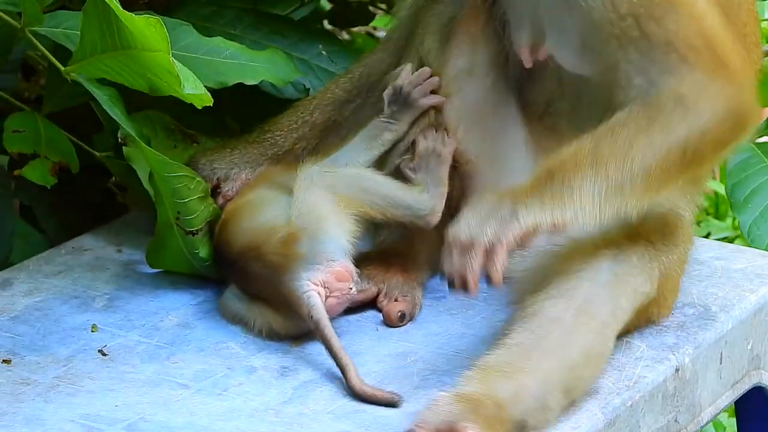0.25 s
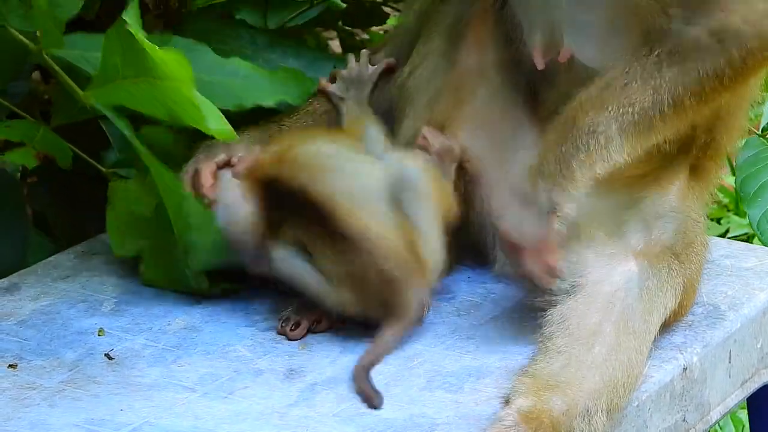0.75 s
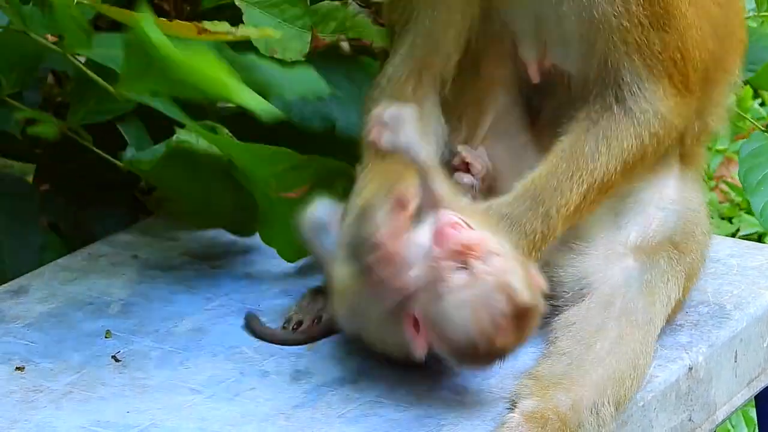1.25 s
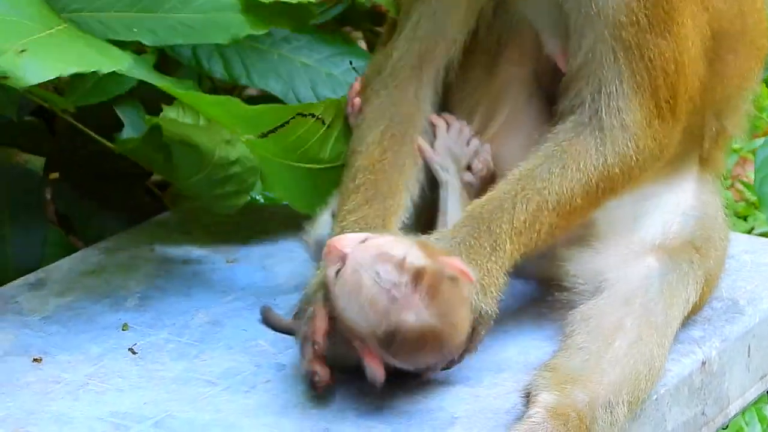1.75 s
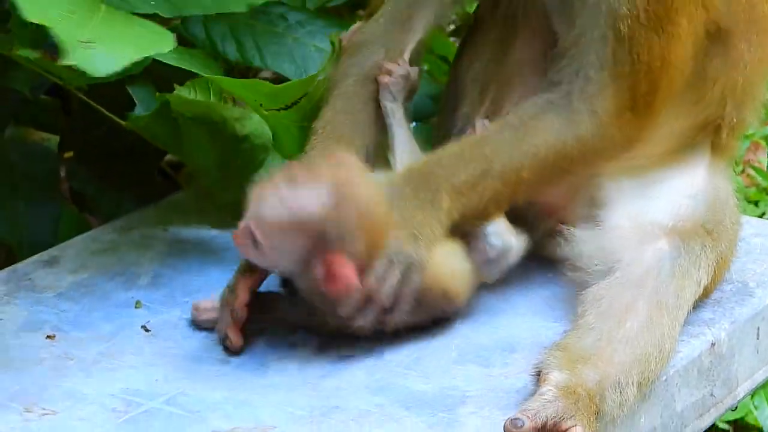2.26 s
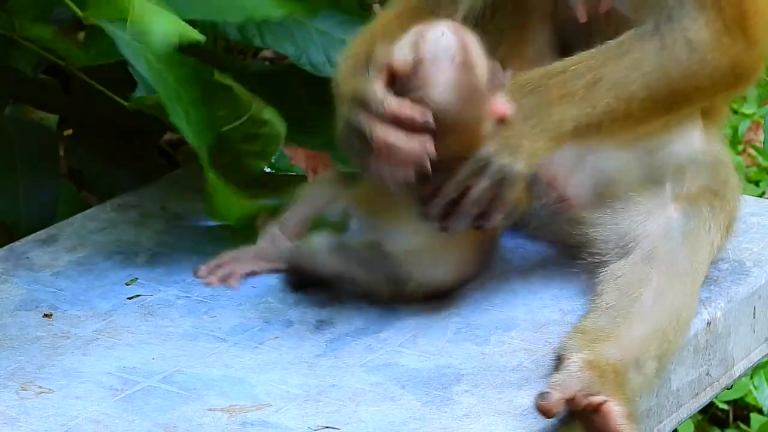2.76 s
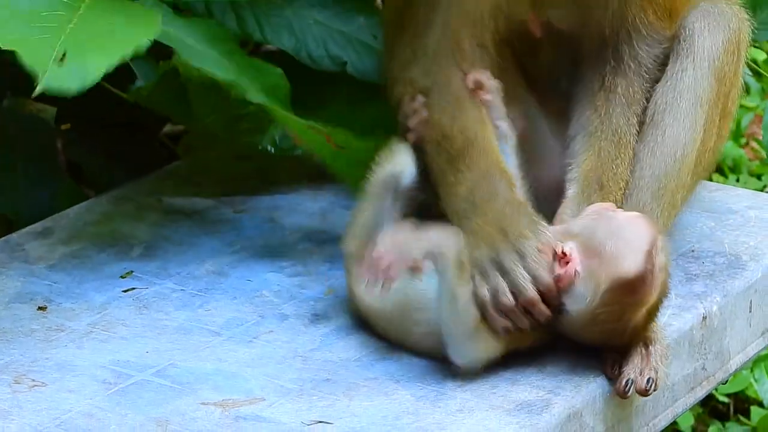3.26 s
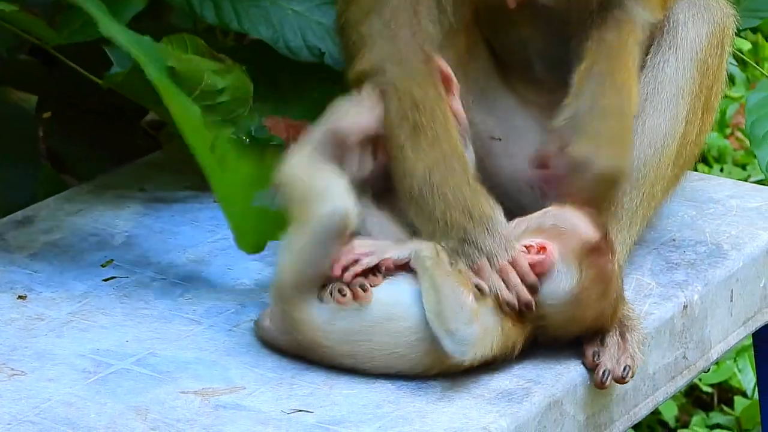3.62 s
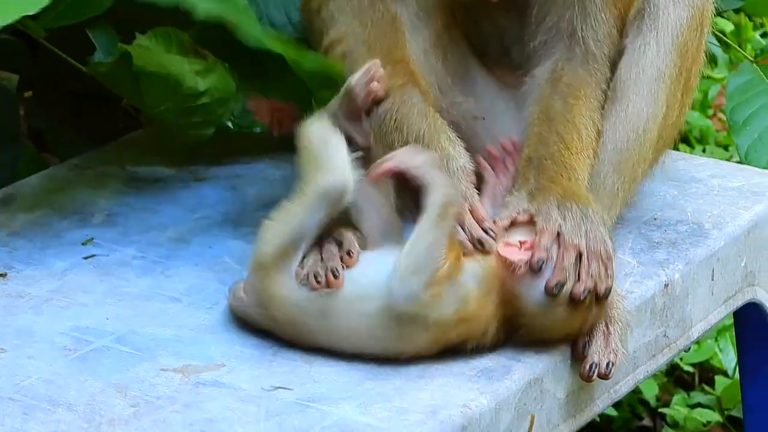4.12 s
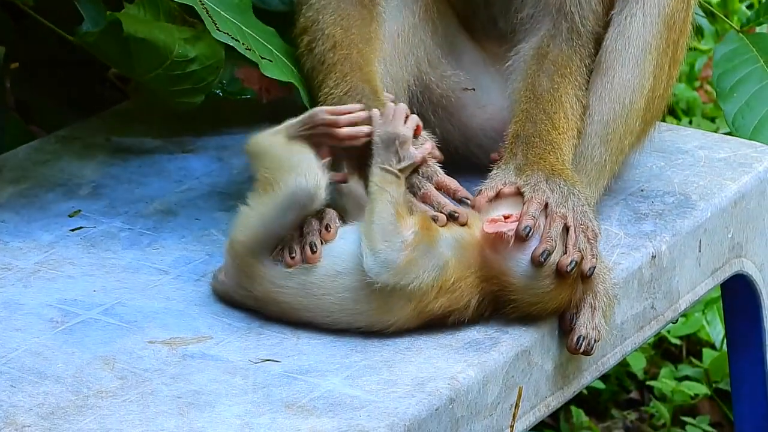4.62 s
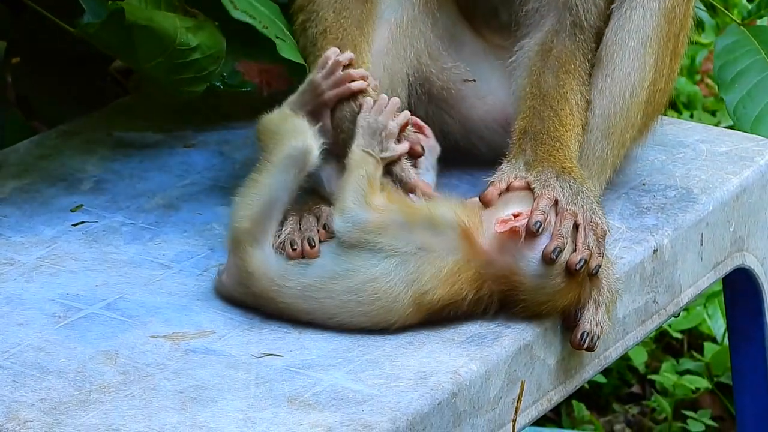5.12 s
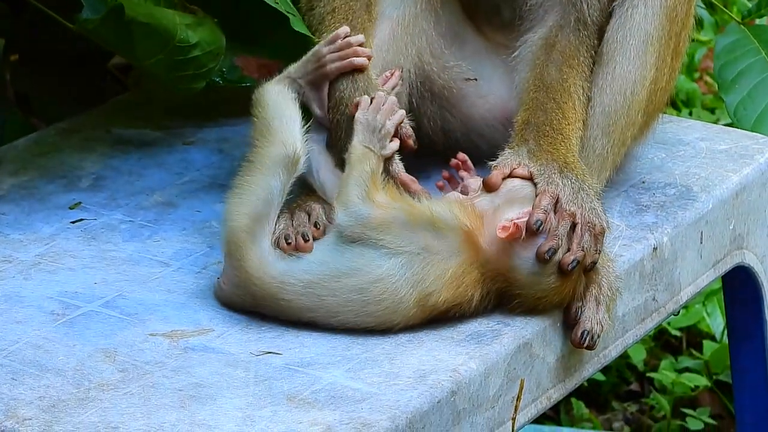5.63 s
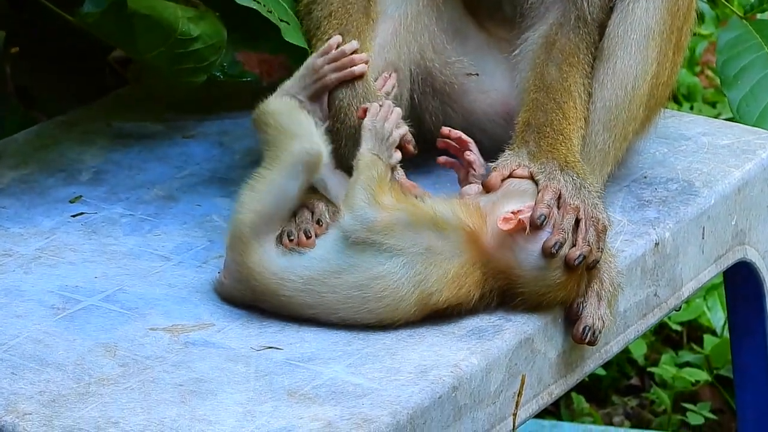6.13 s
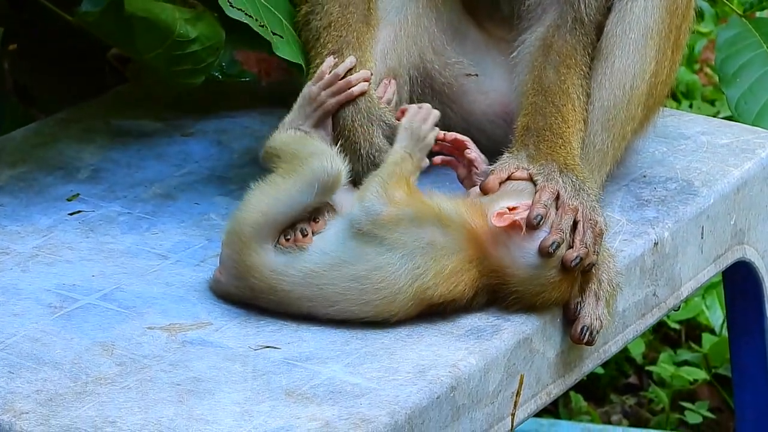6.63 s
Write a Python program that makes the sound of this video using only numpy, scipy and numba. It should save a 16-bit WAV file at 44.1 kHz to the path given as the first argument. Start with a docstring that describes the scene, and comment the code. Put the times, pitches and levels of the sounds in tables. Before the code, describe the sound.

A baby monkey on a plastic table coos, shrieks in piercing ragged bursts between hoarse barks, then quiets to small barks and whimpers outdoors.

```python
"""Baby monkey tantrum

A baby monkey, pinned on a plastic table, coos, screams in bouts amid hoarse barks, and ends in barks and whimpers.
A scream is a whistling membrane tone chopped by the slower, irregular vocal folds; barks are ragged pulses
in the throat; coos and whimpers are harmonic stacks. Limbs knock on the table and brush leaves as filtered
noise; the garden gives a faint echo over a soft outdoor hiss."""
import sys
import numpy as np
from scipy import signal
from scipy.fft import rfft, irfft
from scipy.io import wavfile
from numba import njit

SR = 44100
rng = np.random.default_rng(int(sys.argv[2]) if len(sys.argv) > 2 else 0)


def master_out(mix):
    """Clip the mix to full scale and print it as 16-bit PCM to the path in sys.argv[1]."""
    frames = np.transpose(np.atleast_2d(mix))
    ceiling = np.clip(frames, -1, 1)
    pcm = np.round(ceiling * 32767).astype(np.int16)
    wavfile.write(sys.argv[1], SR, pcm)


N = 303408
T = np.arange(N) / SR


def undb(db):
    """Level in dB to amplitude."""
    return 10 ** (np.asarray(db) / 20)


def unit(x):
    """Scale to an RMS of 1."""
    return x / np.sqrt(np.mean(x ** 2) + 1e-18)


def colour(x, points):
    """Filter by a spectrum of (f/Hz, level/dB) points."""
    hz, db = np.transpose(points)
    f = np.maximum(np.fft.rfftfreq(x.shape[-1], 1 / SR), 1)
    gain = undb(np.interp(np.log(f), np.log(hz), db))
    return irfft(rfft(x) * gain, x.shape[-1])


def wander(n, hz):
    """Smooth random motion of spread 1, mostly slower than hz."""
    lowpass = signal.butter(2, hz, fs=SR, output="sos")
    noise = rng.standard_normal(n + SR // 10)  # the extra tenth of a second lets the filter settle
    return unit(signal.sosfilt(lowpass, noise)[-n:])


@njit
def svf(x, hz, width):
    """State-variable band-pass with a moving centre."""
    y, b, l = np.empty(len(x)), 0., 0.
    for i in range(len(x)):
        g, k = np.tan(np.pi * hz[i] / SR), width / hz[i]
        v = (b + g * (x[i] - l)) / (1 + g * (g + k))
        b, l, y[i] = 2 * v - b, l + 2 * g * v, k * v
    return y


def resonate(x, hz, width):
    """A resonance with steep skirts: two band-passes in a row."""
    centre = np.minimum(hz + np.zeros(len(x)), .45 * SR)
    return svf(svf(x, centre, float(width)), centre, float(width))


def controls(rows):
    """The times that a table spans, and its columns at each of them."""
    s, *columns = np.transpose(rows)
    t = np.arange(max(s[0], 0), s[-1], 1 / SR)
    return t, *(np.interp(t, s, c) for c in columns)


def add(track, start, x):
    """Mix x into the track from start (s), or from the track's beginning if that is negative."""
    i = max(int(start * SR), 0)
    track[i:i + len(x)] += x[:N - i]


def turns(hz):
    """Phase of a gliding pitch (rad)."""
    return 2 * np.pi * np.cumsum(hz) / SR


# outdoor background, before each layer's own trim: [t/s, level/dB]
AIR_LEVEL = [(.8, -47.5), (1.05, -54.5), (2.5, -52.5), (4.0, -60), (4.7, -60.5), (5.5, -54), (6.0, -49),
             (6.85, -48)]
# spectral shape of the low murmur: [f/Hz, relative level/dB per Hz]
MURMUR_SPECTRUM = [(18, -72.5), (30, -64), (91, -9.5), (270, 2), (377, -1.5), (526, -2), (722, 2), (845, 1),
                   (1240, -3.5), (1540, -5), (2000, -9), (2600, -30), (4400, -120)]
# spectral shape of the leafy hiss: [f/Hz, relative level/dB per Hz]
HISS_SPECTRUM = [(880, -13.5), (1500, -3), (1900, -11.5), (2200, -1), (2720, -4), (2920, -2.5), (3120, -1),
                 (6560, -3.5), (11300, -15.5), (13500, -28), (15500, -36)]
DIP_DB, DIP_RECOVERY_S = -7, 0.15  # how far the murmur sinks by a scream's end, and its return time constant


def air(low_db=-2.0, hiss_db=0, low_side=0.32, hiss_side=0.8, right_db=2.5):
    """A low murmur, which sinks during each scream and then returns, and a wide leafy hiss; both flicker."""
    level = np.interp(T, *np.transpose(AIR_LEVEL))
    dips = []
    for rows in SCREAM_CURVES:
        start, end = rows[0][0], rows[-1][0]
        sinking = np.interp(T, (start, end), (0, 1))
        dips.append(sinking * np.exp(-np.maximum(T - end, 0) / DIP_RECOVERY_S))
    dip = np.max(dips, axis=0)
    layers = ((MURMUR_SPECTRUM, level + low_db + DIP_DB * dip, low_side),
              (HISS_SPECTRUM, level + hiss_db, hiss_side))
    out, sides = 0, np.array([[-1], [1]])  # left, right
    for spectrum, level_db, width in layers:
        mid, side = (unit(colour(rng.standard_normal(N), spectrum)) for _ in range(2))
        flicker_db = 1.1 * wander(N, 12)
        out = out + undb(level_db + flicker_db) * (mid + width * sides * side)
    return out * undb(sides * right_db / 2)


# one curve for each clear coo: [t/s, pitch f/Hz, relative level/dB]
COO_CURVES = [
    [(0.0, 910, -27), (0.02, 935, -30), (0.094, 786, -21), (0.116, 831, -32.5), (0.15, 839, -33.5),
     (0.172, 933, -39), (0.25, 960, -62)],
    [(5.64, 632, -34.5), (5.67, 550, -47), (5.688, 750, -34.5), (5.714, 945, -37), (5.748, 773.6, -37.5),
     (5.786, 826, -40.5), (5.89, 779, -51)],
]
# one row a coo, harmonics from the first up, before darkening: [relative level/dB]
COO_STACKS = [
    [0, -5, -5.5, -13, -12.5, -22, -30, -31, -18],
    [-2.6, -2.5, -7, -4.5, -7, -1.5, -6, -7, -12],
]


def coo(rows, harmonics, jitter=0.0125, shimmer_db=2, darken=0.051):
    """Evenly swinging folds give a harmonic stack, duller as the effort fades."""
    t, hz, db = controls(rows)
    n = len(t)
    phase = turns(hz * (1 + jitter * wander(n, 207)))
    effort_db = db - db.max()
    stack = 0
    for k, h in enumerate(harmonics, 1):
        harmonic_db = h + darken * (k - 7.5) * effort_db + shimmer_db * wander(n, 43.0)
        stack = stack + undb(harmonic_db) * np.sin(k * phase)
    return undb(db) * unit(stack)


# limbs knock on the table: [t/s, peak level/dB, centre f/Hz, t60/s]
KNOCK_HITS = [(0.088, -27.5, 885, 0.027), (.451, -34, 1750, 0.04), (.563, -32, 2740, 0.031),
              (0.64, -33, 1780, 0.1), (.651, -24, 1330, 0.075), (.657, -30, 1230, 0.07),
              (.712, -24.5, 2800, 0.032), (1.634, -31, 1490, 0.066), (2.257, -34, 700, 0.042),
              (2.543, -39, 336, 0.19), (4.176, -44, 352, 0.1), (4.58, -39.5, 714, 0.12),
              (5.203, -39, 3400, 0.13), (5.838, -30, 2660, 0.068), (6.433, -32.5, 2400, 0.092),
              (6.457, -22.5, 2200, 0.046), (6.462, -25.5, 1000, 0.074)]
# ringing modes of the table top: [f/Hz, relative level/dB, t60/s]
TABLE_RING = [(338, -3.5, 0.038), (643, -4, 0.033), (810, -10.5, 0.019), (1430, -18.5, 0.067),
              (2400, -9.5, 0.042), (3330, -30, 0.012)]
# leaves and fur brush past: [t of the swell's middle/s, level/dB, length/s, centre f/Hz]
BRUSHES = [(.1, -39, 0.075, 2800), (0.195, -38, 0.021, 3000), (0.24, -39.5, 0.013, 3070),
           (0.285, -43, 0.031, 3760), (0.721, -51, 0.013, 4000), (1.646, -38.5, 0.013, 5650),
           (2.054, -41, 0.03, 2530), (6.07, -41.5, 0.016, 2870)]


def scuffle(ring_db=-7, grain_db=4):
    """Noise knocks ring the table modes through a band of their own; brushed leaves crackle in short swells."""
    out, t = np.zeros(N), T[:SR // 4]
    for s, db, hz, t60 in KNOCK_HITS:
        ring = sum(undb(d - 60 * t / life) * np.sin(2 * np.pi * f * t) for f, d, life in TABLE_RING)
        thud = rng.standard_normal(len(t)) * undb(-60 * t / t60)
        hit = resonate(thud + undb(ring_db) * ring, hz, 1.08 * hz)
        add(out, s, undb(db) * hit / np.abs(hit).max())
    middle = t.mean()
    for s, db, length, hz in BRUSHES:
        grains = rng.standard_normal(len(t)) * undb(grain_db * wander(len(t), 470))
        swell = np.exp(-2 * ((t - middle) / length) ** 2)
        add(out, s - middle, undb(db) * unit(resonate(grains, hz, 1.6 * hz)) * swell)
    return out


def folds(phase, shimmer_db):
    """One band-limited click at each closure of the vocal folds, each with its own strength."""
    lag = ((phase + np.pi) % (2 * np.pi) - np.pi) / np.gradient(phase)  # samples from the nearest closure
    clicks = unit(np.sinc(.8 * lag) * np.exp(-(lag / 6) ** 2))
    return clicks * undb(shimmer_db * np.tanh(wander(len(phase), 300)))


def ends(n):
    """The voice starts within a few milliseconds and dies a little more slowly."""
    i = np.arange(n)
    return np.minimum(i / (.0025 * SR), 1) * np.minimum(i[::-1] / (.006 * SR), 1)


# each scream scoops up to pitch and breaks into a screech, one row a scream: [starting pitch/0-1 of the full pitch,
# break t/s, break length/s, roughness added by the break/0-1, roughness early/0-1, roughness late/0-1,
# fold pitch at the break f/Hz, fold glide/Hz per s, fold tone level/dB, treble level/dB];
# both levels are relative to the whistle, at half roughness
SCREAM_BREAKS = [(0.97, 0.95, .014, 0.5, 0.26, 0.26, 624, 897, -33, -9.5),
                 (.8, 1.16, 0.016, 0.28, 0.35, .25, 790, -200, -33, -7),
                 (.55, 2.644, .013, .7, .26, .26, 430, -800, -44, -7.5),
                 (1, 2.885, 0.0452, 0.55, 0.21, 0.55, 690, -800, -34.5, -10),
                 (1, 3.25, 0.0422, 0.45, 0.53, 0.05, 874, -300, -32.5, -6),
                 (.7, 3.826, 0.015, .35, 0.41, .42, 695, -1300, -36, -11),
                 (0.99, 4.192, 0.013, 0.74, 0, 0.33, 550, 0, -54, -19.5)]
CLEAR_START_S, CLEAR_START_DB = .02, -7.5  # a scream starts clear: for how long, and how much duller
SCOOP_S = .017  # time to reach the full pitch
TEAR_TREBLE_DB, TEAR_FOLD_DB = 15.5, 29.5  # gain of treble and of the folds' own tone from clear to fully rough


def scream_controls(rows, voice):
    """Roughness follows a clear, scooped start and swells at the break; treble and fold tone grow with it."""
    t, hz, db = controls(rows)
    scoop, break_s, break_length, tear, early, late, fold_hz, glide, fold_db, treble_db = voice
    since = t - t[0]
    settled = np.minimum(since / CLEAR_START_S, 1)
    breaking = tear * np.exp(-((t - break_s) / break_length) ** 2)
    rough = np.clip(settled * np.linspace(early, late, len(t)) + breaking, 0, 1)
    high_db = db + treble_db + TEAR_TREBLE_DB * (rough - .5) + CLEAR_START_DB * (1 - settled)
    hz = hz * np.interp(since, (0, SCOOP_S), (scoop, 1))
    fold_hz = fold_hz + glide * (t - break_s)
    return t, hz, db, high_db, rough, fold_hz, fold_db + TEAR_FOLD_DB * (rough - .5)


# one curve a scream: [t/s, whistle pitch f/Hz, relative level/dB]
SCREAM_CURVES = [
    [(0.83, 3526, -14.5), (0.844, 3639, -10), (0.864, 4037, -22), (0.874, 3634, -19), (0.892, 3776, -20.5),
     (0.914, 4144, -22), (0.934, 4700, -14), (0.954, 4100, -26.5), (0.974, 4240, -36)],
    [(1.14, 4090, -33), (1.164, 3614, -24), (1.178, 3830, -20), (1.19, 5150, -23), (1.198, 5350, -18.5),
     (1.222, 5178, -28.5), (1.246, 4550, -22), (1.269, 3460, -31)],
    [(2.542, 3177, -27), (2.548, 3240, -33), (2.556, 3012, -22), (2.568, 3097, -13), (2.628, 4158, -16),
     (2.64, 3920, -24), (2.648, 4200, -26), (2.662, 4200, -43)],
    [(2.77, 3913, -51), (2.776, 3805, -15.5), (2.82, 4280, -13.5), (2.842, 4630, -22.5),
     (2.882, 4326, -25.5), (2.986, 4414, -23), (2.994, 4950, -29), (3.03, 4666, -30.5),
     (3.056, 5010, -36.5)],
    [(3.16, 3993, -32), (3.168, 4262, -22.5), (3.196, 4868, -25.5), (3.24, 4760, -25.5),
     (3.262, 4180, -30.5), (3.286, 4720, -22.5), (3.31, 4302, -23), (3.42, 4470, -29), (3.48, 4296, -26),
     (3.542, 4650, -29.5), (3.548, 5130, -25), (3.568, 5200, -28), (3.602, 4140, -32.5),
     (3.628, 5070, -19.5), (3.638, 4640, -19.5), (3.654, 4870, -50)],
    [(3.777, 3427, -45), (3.787, 3533, -25), (3.821, 4340, -20.5), (3.831, 4193, -35), (3.859, 4639, -12.5),
     (3.903, 4415, -34.5), (3.915, 4770, -17), (3.925, 4200, -35), (3.934, 4300, -43)],
    [(4.161, 4400, -18.5), (4.173, 4631, -18), (4.189, 4410, -26), (4.207, 4630, -32)],
]
# turbulence in the open mouth: [f/Hz, relative level/dB per Hz]
RASP_SPECTRUM = [(40, -58), (400, -25), (1300, -51), (1900, -15.5), (3000, -1.5), (5000, 6), (6800, 3),
                 (8500, -5.5), (11000, -4), (13000, -10.5), (15500, -28)]


def scream(rows, tearing, chop=0.39, pull=1.0, flutter_db=3.0, octave_db=-4, rasp_db=0,
           throat_width=2300, skirt_width=4200):
    """The folds shake the whistle into sidebands; with roughness their own harmonics take over as a torn screech."""
    t, hz, db, high_db, rough, fold_hz, fold_db = scream_controls(rows, tearing)
    n = len(t)
    # folds and whistle lurch about their pitch
    fold = turns(fold_hz * (1 + .045 * wander(n, 55) + .03 * rough * wander(n, 350)))
    hz = hz * (1 + .09 * np.minimum(rough, .5) * wander(n, 85))
    phase = turns(hz) + rough * (pull * np.sin(fold) + .3 * wander(n, 600))
    swell = undb(flutter_db * np.sqrt(rough) * wander(n, 130))
    whistle = unit(swell * (1 + chop * rough * np.cos(fold + 0.75)) * np.sin(phase))
    pulses = folds(fold, 3) + .2 * rng.standard_normal(n)
    screech = unit(resonate(resonate(pulses, hz, throat_width), 1.09 * hz, skirt_width))
    share = np.clip(1.1 * rough ** 1.5, 0, .9)  # the screech's part of the power
    voice = np.sqrt(1 - share) * whistle + np.sqrt(share) * screech
    low = undb(fold_db) * unit(np.sin(fold) + 0.59 * np.sin(2 * fold))
    # the folds' upper harmonics pass the mouth, whose wavering resonances tear them into strands
    mouth = sum(resonate(pulses, f * (1 + .05 * wander(n, 40)), 700) for f in (6100, 7100, 8600, 10500))
    rasp = unit(colour(.45 * pulses + mouth, RASP_SPECTRUM))
    # a clear whistle carries its octave, and a fainter twelfth
    octave = unit(swell * (np.sin(2 * phase) + 0.23 * np.sin(3 * phase)))
    high = undb(octave_db) * (1 - rough) * octave + undb(rasp_db) * rough ** 0.11 * rasp
    return (undb(db) * (voice + low) + undb(high_db) * high) * ends(n)


# a bark starts through a nearly shut mouth and fades as it closes: (low dB, middle dB, high dB)
BARK_START_DB, BARK_END_DB = (-4, -8, -27), (-12.5, -12.5, -18)
BARK_FADE_POWER = 1.35  # above 1 the mouth lingers near its widest
BARK_GRAIN_DB, BARK_GRAIN_HZ = 2.5, 169  # the voice catches and breaks up


def bark_controls(row):
    """The mouth opens and closes once, shaping three bands; the throat resonance glides and the voice catches."""
    _, length, widest, start_hz, end_hz, *peaks_db = row
    t = np.arange(0, length, 1 / SR)
    opening = np.interp(t, (0, widest), (1, 0))
    closing = np.interp(t, (widest, length), (0, 1)) ** BARK_FADE_POWER
    grain_db = BARK_GRAIN_DB * wander(len(t), BARK_GRAIN_HZ)
    levels = (peak + start * opening + end * closing + grain_db
              for peak, start, end in zip(peaks_db, BARK_START_DB, BARK_END_DB))
    return t, np.geomspace(start_hz, end_hz, len(t)), *levels


# barks: [t/s, length/s, time to the widest mouth/s, first throat resonance at the start f/Hz, at the end f/Hz,
# low level/dB, middle level/dB, high level/dB], levels at the widest mouth
BARK_CALLS = [(1.478, .064, 0.039, 1492, 1590, -40, -51, -50),
              (1.688, 0.09, 0.05, 1545, 1442, -33, -33.5, -34),
              (3.8, 0.1, 0.015, 1595, 1102, -42, -30, -43),
              (4.086, 0.044, 0.025, 1246, 1268, -50.5, -34, -42),
              (4.35, .08, 0.031, 1280, 1105, -49.5, -36, -44),
              (5.407, 0.022, 0.0084, 1617, 1690, -43.5, -57, -74),
              (5.434, 0.035, .01, 962, 944, -53, -51.5, -60),
              (5.603, .095, .012, 1504, 850, -40, -40.5, -42.5),
              (6.314, .036, 0.017, 1448, 1077, -30, -32, -31),
              (6.349, 0.0296, 0.0068, 1200, 1098, -41, -41, -43),
              (6.528, 0.075, 0.018, 1411, 1250, -34, -25.5, -30),
              (6.725, 0.057, 0.016, 1702, 1194, -37.5, -23.5, -20.5)]
# upper throat resonances, middle group: [f/Hz, width/Hz, relative level/dB]
MIDDLE_RESONANCES = [(3370, 400, 3.5), (4220, 1340, 5.5), (5240, 660, -3)]
# upper throat resonances, high group: [f/Hz, width/Hz, relative level/dB]
HIGH_RESONANCES = [(5920, 240, 2.5), (6700, 280, 8), (7570, 870, -4), (9380, 1300, -7), (11200, 700, -17)]


def throat(source, resonances):
    """Wavering throat resonances ring side by side."""
    return sum(undb(db) * resonate(source, hz * (1 + 0.029 * wander(len(source), 67)), width)
               for hz, width, db in resonances)


def bark(row, first_width=750, second_ratio=2.22, second_width=520, second_db=3, leak_db=-10):
    """Ragged fold pulses ring the throat, whose two lowest resonances glide along with the pitch."""
    t, first_hz, low_db, middle_db, high_db = bark_controls(row)
    n = len(t)
    fold = turns(first_hz / 2 * np.exp(.04 * wander(n, 70) + .055 * wander(n, 400)))
    # strong and weak pulses alternate, which makes the voice hoarse
    source = folds(fold, 2) * (1 + .4 * np.cos(fold / 2)) + .4 * rng.standard_normal(n)
    second_hz = np.minimum(second_ratio * first_hz, 3250)
    second = undb(second_db) * resonate(source, second_hz, second_width)
    middle = throat(source, MIDDLE_RESONANCES) + second
    high = throat(source, HIGH_RESONANCES)
    low = unit(resonate(source, first_hz, first_width)) + undb(leak_db) * unit(resonate(source, 700, 940))
    return (undb(low_db) * low + undb(middle_db) * unit(middle) + undb(high_db) * unit(high)) * ends(n)


# thin whimpers, each one glide: [t/s, length/s, start pitch f/Hz, end pitch f/Hz, level at the middle/dB]
WHIMPER_CALLS = [(3.079, .065, 353, 296, -57), (4.83, .31, 539, 527, -65.5),
                 (6.554, 0.036, 643, 545, -36.5), (6.595, .15, 434.4, 297, -50.5),
                 (6.838, 0.06, 334, 338, -59)]
# harmonics of a whimper from the first up, before darkening: [relative level/dB]
WHIMPER_STACK = [0, -9]
WHIMPER_EDGE_DB = -4.5  # start and end of a whimper relative to its middle


def whimper(s, length, start_hz, end_hz, db):
    """A faint, unsteady coo that swells and fades on one glide."""
    edge_db = db + WHIMPER_EDGE_DB
    rows = [(s, start_hz, edge_db),
            (s + length / 2, np.sqrt(start_hz * end_hz), db),
            (s + length, end_hz, edge_db)]
    return coo(rows, WHIMPER_STACK, jitter=0.015, shimmer_db=4.5)


def monkey(scream_db=1.5, bark_db=0, coo_db=-1.5):
    """All the baby's calls, from one throat."""
    out = np.zeros(N)
    for rows, harmonics in zip(COO_CURVES, COO_STACKS):
        add(out, rows[0][0], undb(coo_db) * coo(rows, harmonics))
    for rows, voice in zip(SCREAM_CURVES, SCREAM_BREAKS):
        add(out, rows[0][0], undb(scream_db) * scream(rows, voice))
    for row in BARK_CALLS:
        add(out, row[0], undb(bark_db) * bark(row))
    for row in WHIMPER_CALLS:
        add(out, row[0], whimper(*row))
    return out


# hard surfaces close by: [delay at the left port/s, delay at the right port/s, level/dB]
NEAR_REFLECTIONS = [(.00585, .00588, -13), (.0083, 0.0076, -20)]
# scatter from the table and bodies, stronger in the treble: [f/Hz, level/dB]
SCATTER_COLOUR = [(500, -9), (2500, -9), (4500, -6), (7500, 3), (14000, 3)]
# colour of the garden's echo: [f/Hz, relative level/dB]
ECHO_COLOUR = [(100, -19), (1000, -21), (4500, 8), (7000, 5), (14000, -15)]
# the microphone ports soften the treble: [f/Hz, level/dB]
PORT_COLOUR = [(1000, 3.5), (4500, -2), (7500, -2.5), (14000, -10.5)]


def garden(x, far_db=-25, near_t60=0.078, far_t60=0.9, right_db=1.7):
    """Table and bodies scatter the sound at once, walls and trees later; it reaches the left port a little earlier."""
    t, f = T[:SR], np.fft.rfftfreq(N, 1 / SR)
    port_lag_s = (0, .000018)
    out = []
    for port, side in enumerate((-1, 1)):
        burst = unit(rng.standard_normal(SR) * undb(-60 * t / near_t60))
        near = colour(burst, SCATTER_COLOUR)[:SR // 4]
        far_fade = undb(-60 * t / far_t60) * np.minimum(t / 0.017, 1)
        far = unit(colour(rng.standard_normal(SR), ECHO_COLOUR) * far_fade)
        response = undb(far_db) * far
        add(response, 0, near)
        paths = np.exp(-2j * np.pi * f * port_lag_s[port])
        for row in NEAR_REFLECTIONS:
            paths = paths + undb(row[-1]) * np.exp(-2j * np.pi * f * row[port])
        early = irfft(rfft(x) * paths, N)
        diffuse = signal.fftconvolve(x, response / np.sqrt(SR))[:N]
        out.append(undb(side * right_db / 2) * colour(early + diffuse, PORT_COLOUR))
    return np.array(out)


def scene():
    """Calls and scuffle sound through the garden, over the open air."""
    return garden(monkey() + scuffle()) + air()


def record(dry, low_cut_hz=60, lopsided=.015, top_hz=15550):
    """The recorder bends the wave lopsidedly, thins the deep bass, rounds the peaks and cuts the top."""
    low_cut = signal.butter(2, low_cut_hz, "high", fs=SR, output="sos")
    thin = signal.sosfilt(low_cut, dry + lopsided * dry ** 2)
    rounded = thin / (1 + (thin / .8) ** 4) ** .25
    return signal.sosfilt(signal.ellip(10, .2, 80, top_hz, fs=SR, output="sos"), rounded)


dry = scene()
out = record(dry)
master_out(out)
```